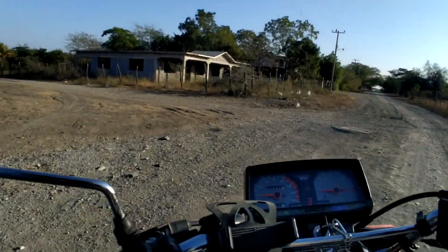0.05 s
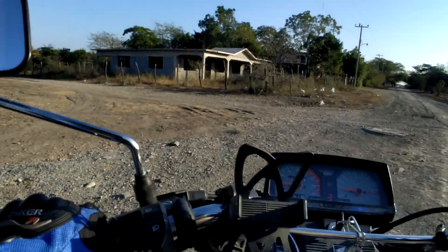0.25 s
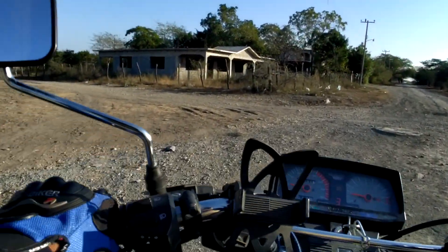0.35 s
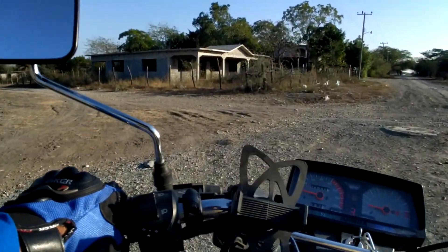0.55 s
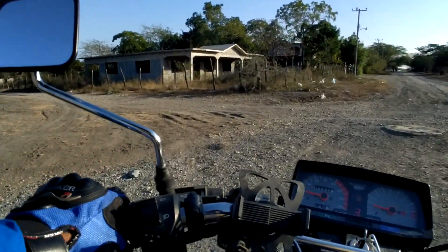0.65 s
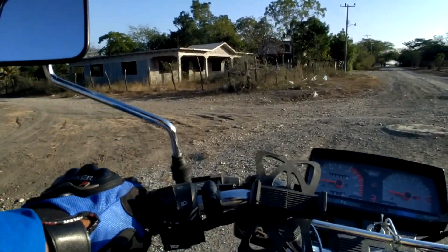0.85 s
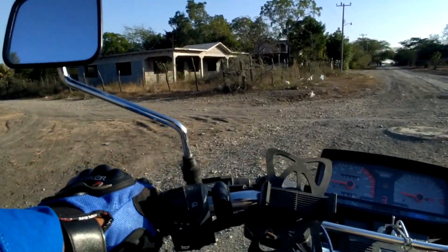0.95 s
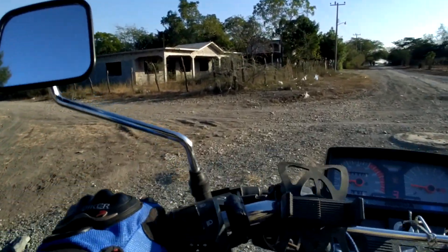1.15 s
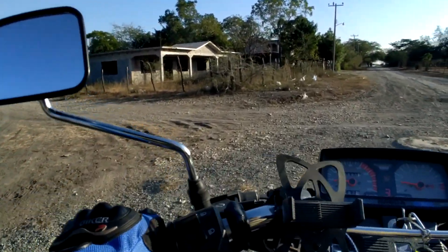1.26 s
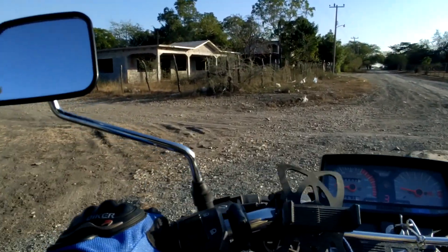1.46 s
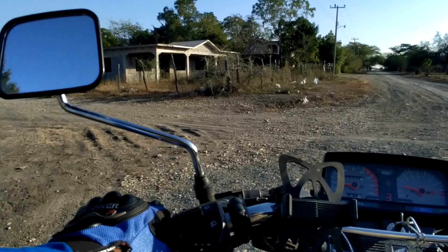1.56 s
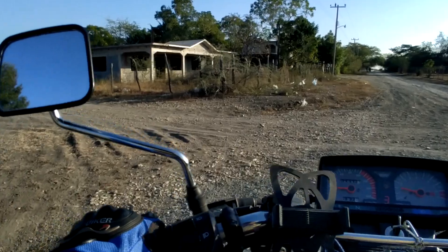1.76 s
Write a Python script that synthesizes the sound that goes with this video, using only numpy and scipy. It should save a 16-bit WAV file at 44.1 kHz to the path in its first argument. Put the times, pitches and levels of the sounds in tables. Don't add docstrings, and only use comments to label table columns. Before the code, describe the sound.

A motorcycle engine idles with sharp metallic ticking, revs up, then eases back, outdoors in light wind.

```python
import sys
import numpy as np
from scipy import signal
from scipy.io import wavfile
from scipy.ndimage import uniform_filter1d

SR = 44100
rng = np.random.default_rng(int(sys.argv[2]) if len(sys.argv) > 2 else 0)


def magnitude_from_level(level_db):
    exponent = np.asarray(level_db, float) / 20
    return 10 ** exponent


def persist_wave(psi):
    counts = np.round(np.clip(psi, -1, 1) * 32767).astype(np.int16)
    wavfile.write(sys.argv[1], SR, np.atleast_2d(counts).T)


N = 79380

# (time [s], cycle rate [cycles/s])
ENGINE_SPEED = [(0.0, 10.64), (0.17, 10.69), (0.3, 10.06), (0.46, 10.73), (0.62, 10.42), (0.8, 11.96),
                (0.97, 14.02), (1.1, 16.9), (1.25, 20.27), (1.38, 21.79), (1.46, 19.98), (1.6, 17.73),
                (1.8, 15.1)]
# (time [s], level [dB])
EFFORT = [(0, -60), (.2, -62.5), (.6, -61.5), (.72, -58.5), (.9, -55), (1.0, -52.5), (1.15, -46),
          (1.36, -42), (1.5, -45.5), (1.62, -48), (1.8, -52.5)]
# (time [s], level [dB])
THROTTLE = [(0, -50), (.07, -42), (.2, -50.5), (.33, -47.5), (.5, -52.5), (.7, -48), (.8, -45), (.86, -49),
            (.885, -62), (1.0, -44.5), (1.15, -41), (1.25, -34), (1.3, -38.5), (1.35, -33.5), (1.45, -45),
            (1.6, -39.5), (1.8, -49.5)]
# (frequency [Hz], width [Hz], idle level [dB], full-speed level [dB], second valve's extra level [dB])
HEAD_MODES = [(2164, 220, -48, -6.5, -8), (3073, 246, -9, -8.5, -31), (3508, 28, -9.5, -29, -13),
              (4010, 430, -20, -2, -1), (5205, 410, -10.5, -1.5, -16), (5628, 120, -6.5, -6.5, -11),
              (6880, 180, -31, -0.5, -21), (8130, 360, -19, -1, -5), (9520, 870, -6.5, -4, -27),
              (11750, 570, -13.5, -3.5, -13), (13200, 710, -14, -13, -6), (15000, 500, -12, -8, -1)]
# (frequency [Hz], width [Hz], level [dB])
OVERRUN_MODES = [(5600, 250, 4.5), (4060, 200, 3), (3120, 200, 3)]
# (frequency [Hz], density [dB per Hz])
EXHAUST_HISS = [(3000, -9), (6000, -10), (7200, 6), (8500, 10), (10000, 5), (12000, 3.5), (15500, -4)]
# (frequency [Hz], width [Hz], level [dB])
AIRBOX_MODES = [(562, 39, -8.5), (790, 97, 2), (971, 34, 1), (1107, 27, -3), (1193, 41, 2), (1341, 19, 0.5),
                (1507, 160, -7)]
# (place [cycles], length [cycles], level [dB])
GULPS = [
    (0.216, 0.073, -1.5),
    (0.368, 0.092, -5.5),
    (0.698, 0.2, -11),
]
# (time [s], peak level [dB], frequency [Hz], t60 [s])
HONKS = [(.045, -46, 980, .1), (0.058, -43, 1200, 0.086), (0.143, -41, 1210, 0.066),
         (0.32, -44.5, 1348, 0.25), (0.427, -42, 1000, 0.097), (0.476, -47.5, 1297, 0.22),
         (.523, -48, 1263, 0.087), (0.531, -37, 800, 0.075), (.617, -44, 990, 0.069),
         (0.706, -45.5, 1327, 0.18), (0.801, -38, 986.6, 0.13), (0.88, -33, 981, 0.13),
         (0.913, -37, 980, .06), (0.953, -34, 997, .11), (0.985, -33, 975, 0.028),
         (1.023, -30, 1086, 0.069), (1.057, -39.5, 1036, 0.24), (1.086, -34, 1051, 0.072),
         (1.096, -40, 1200, 0.2), (1.14, -35, 1328, 0.13), (1.168, -35, 1245, 0.074),
         (1.196, -37, 1090, 0.22), (1.246, -29.5, 1124, 0.098), (1.257, -32, 1340, .15),
         (1.317, -33, 1060, 0.13), (1.343, -29.5, 978, 0.14), (1.348, -31, 1102, 0.21),
         (1.378, -31, 960, 0.05), (1.391, -33, 1077, 0.039), (1.412, -32, 1000, 0.083),
         (1.424, -38, 570, 0.18), (1.463, -34, 988, 0.067), (1.466, -43, 563, 0.11),
         (1.505, -46.5, 562, 0.18), (1.544, -52.5, 1199, 0.14), (1.596, -37, 1204, 0.065),
         (1.742, -35.5, 1127, 0.055), (1.779, -37, 1104, 0.07)]
# (frequency [Hz], density [dB per Hz])
WHIRR_SPECTRUM = [(180, -53), (350, -9), (620, -14.5), (1100, -1), (1870, -4), (3950, -9), (6000, -11),
                  (7080, -7), (16000, -31.5)]
# (frequency [Hz], width [Hz], level [dB])
WHIRR_BANDS = [(2270, 440, -11), (3530, 160, 34), (3930, 110, 31), (7900, 83, 21), (6840, 60, 36),
               (6570, 450, 11)]
# (time [s], peak level [dB], frequency [Hz], t60 [s])
RATTLES = [
    (.0005, -35, 14660, 0.03),
    (.001, -35, 13200, 0.012),
    (0.024, -33, 13620, 0.036),
    (0.208, -35.5, 890, 0.16),
    (0.242, -35.5, 820, 0.091),
    (0.349, -55.5, 7400, 0.11),
    (0.828, -41.5, 8270, 0.022),
    (1.514, -41, 13700, 0.017),
    (1.66, -41, 13500, .08),
]
# (time [s], level [dB])
GUSTS = [(0.0, -56.5), (0.1, -48), (0.134, -27.5), (0.18, -31.5), (0.21, -27), (0.25, -12.5),
         (0.274, -25.5), (0.396, -54), (0.51, -27), (0.66, -42), (0.896, -30.5), (0.946, -47),
         (1.172, -49.5), (1.182, -35.5), (1.382, -46.5), (1.422, -41.5), (1.728, -59.5), (1.8, -59)]
# (frequency [Hz], density [dB per Hz])
TURBULENCE = [(20, -25), (50, -11.5), (100, 2), (200, -1.5), (350, -8), (600, -28), (1000, -30.5),
              (2000, -66)]
# (time [s], peak level [dB], frequency
# [Hz], length [cycles])
EDDIES = [(0.138, -25, 225, 0.72), (0.154, -27, 190, 2.5), (0.207, -13.5, 264, 1.4),
          (0.212, -6.5, 430, 1.34), (.217, -8.5, 198, 0.96), (0.2238, -14, 256, 1.5),
          (0.2282, -17, 247, 1.23), (0.2386, -18.5, 230, 0.64), (0.243, -13, 201, 1.35),
          (0.2477, -16, 385, 0.7), (0.256, -8.5, 196, 0.49), (.248, -21.5, 100.6, 2.2),
          (0.269, -30, 143, 3.1), (0.296, -19.5, 121, 1.15), (.447, -27, 200, 0.94),
          (0.463, -22, 111, 1.63), (.473, -27.5, 420, 1.36), (0.475, -20, 134, 0.8),
          (0.482, -23.5, 150, .8), (0.492, -27, 160, 1.6), (0.507, -15.5, 135, 0.88),
          (0.5133, -14, 297, 1.14), (0.526, -29, 140, 0.95), (.549, -20, 256, 0.65),
          (0.5576, -12, 186, 0.7), (.546, -16.5, 148, 0.9), (.56, -31, 597, 1.9), (.573, -20, 105, 2.3),
          (0.579, -26, 220, 0.36), (0.689, -29, 185, 0.84), (0.754, -26.5, 168, 2.1),
          (1.56, -27.5, 104, 1.6), (.803, -24, 180, 2.3), (.82, -26.5, 242, 1.5), (0.847, -19.5, 146, 0.9),
          (0.887, -16.5, 182, 1.94), (0.902, -21.5, 141, 2.2), (0.919, -23.5, 113, 2.3),
          (1.19, -30, 199, 1.25), (1.419, -30.5, 163, 2.6), (1.462, -27.5, 115, 2.5),
          (1.476, -31.5, 125, 1.3), (1.487, -30, 128, 0.87), (1.497, -31, 201, 1), (1.503, -24.5, 105, 1),
          (1.514, -30, 97.2, 0.91)]
# (frequency [Hz], density [dB per Hz])
RUMBLE_SPECTRUM = [(15, -26), (40, -0.5), (80, 2.5), (160, -17), (400, -19), (800, -52)]

FIRST_TICK_S = 0.0248
IDLE_HZ, FULL_HZ = 10.5, 21.5
SECOND_VALVE_AT = 0.582
TICK_FOLLOW = 0.87
PISTON_HZ = 3450
FULL_PULL = 6


def evened(x):
    return x / np.sqrt(np.mean(x ** 2) + 1e-20)


def curve(table):
    times, values = np.transpose(table)
    return np.interp(np.arange(N) / SR, times, values)


def resonate(x, hz, width):
    r = np.exp(-np.pi * width / SR)
    return 2 * signal.lfilter([1 - r], [1, -r * np.exp(2j * np.pi * hz / SR)], x).real


def noise(spectrum, patchy_db, size=512):
    frames, hz = 4 * N // size + 5, np.fft.rfftfreq(size, 1 / SR)
    real, imaginary, patches = rng.standard_normal((frames, len(hz), 3)).T
    patches = uniform_filter1d(patches, size=5, axis=0)
    patches = evened(uniform_filter1d(patches, size=8, axis=1))
    f, db = np.transpose(spectrum)
    shape = np.interp(np.log(hz + 1), np.log(f + 1), db)[:, None]
    bins = (real + 1j * imaginary) * magnitude_from_level(shape + patchy_db * patches)
    return evened(signal.istft(bins, nperseg=size, noverlap=3 * size // 4)[1][:N])


def crank(place=0.):
    rate = curve(ENGINE_SPEED)
    turns = np.cumsum(rate) / SR
    turns = turns - turns[round(FIRST_TICK_S * SR)] - place + 2
    part = turns % 1
    revs = np.clip((rate - IDLE_HZ) / (FULL_HZ - IDLE_HZ), 0, 1)
    return turns.astype(int), part, part / rate, revs


def onsets(cycle):
    return np.diff(cycle, prepend=cycle[0]) > 0


def vary(cycle, spread_db, count=1):
    return magnitude_from_level(spread_db * rng.standard_normal((40, count))[cycle].T)


def effort_db(follow):
    db = curve(EFFORT)
    return db.max() + follow * (db - db.max())


def pull():
    return uniform_filter1d(np.gradient(curve(ENGINE_SPEED)) * SR, size=6000) / FULL_PULL


def load_db(hz):
    return 7 * np.clip(pull(), -1, 1) * np.exp(-((hz - PISTON_HZ) / 250) ** 2)


def overrun_db(hz):
    drag = np.clip(-pull(), 0, 1)
    return drag * sum(db * np.exp(-((hz - f) / width) ** 2) for f, width, db in OVERRUN_MODES)


def valves():
    tick_db, strike_db, second_valve_db, spread_db = 16, 23, -6, 1.5
    rise_s, decay_s, quicken = 0.00078, 0.0067, 0.49
    dull_hz = 8350
    out = np.zeros(N)
    for second, place in enumerate([0, SECOND_VALVE_AT]):
        cycle, _, since, revs = crank(place)
        strike = magnitude_from_level(strike_db) * onsets(cycle)
        scrape = (1 - np.exp(-since / rise_s)) * np.exp(-since / decay_s / (1 - quicken * revs))
        level = magnitude_from_level(effort_db(TICK_FOLLOW) + tick_db)
        gains = vary(cycle, spread_db, count=len(HEAD_MODES))
        for (hz, width, idle_db, full_db, second_db), gain in zip(HEAD_MODES, gains):
            db = idle_db + (full_db - idle_db) * revs + second * (second_valve_db + second_db)
            db = db + load_db(hz) + overrun_db(hz)
            blow = strike * np.exp(-hz / dull_hz) + scrape * rng.standard_normal(N)
            ring = resonate(resonate(level * gain * magnitude_from_level(db) * blow, hz, 4.3 * width), hz, width)
            out += ring * np.sqrt(SR / width / 10)
    return out


def piston():
    slap_db, full_speed_db, second_db, width = 13, -10, -3, 200
    slaps = np.zeros(N)
    for place, db in [(0, 0), (SECOND_VALVE_AT, second_db)]:
        cycle, _, _, revs = crank(place)
        level = effort_db(TICK_FOLLOW) + slap_db + full_speed_db * revs + db + load_db(PISTON_HZ)
        slaps += onsets(cycle) * magnitude_from_level(level)
    ring = resonate(resonate(slaps, PISTON_HZ, 4 * width), PISTON_HZ, width)
    return ring * SR / (2 * np.pi * width)


def exhaust_thump():
    idle_db, full_db, load_share = -33, -34, 0.66
    cycle, part, since, revs = crank(0.4025)
    pitch = vary(cycle, 0.5)[0]

    def ring(hz, rise_s):
        swell = (since / rise_s * np.exp(1 - since / rise_s)) ** 2
        return swell * np.sin(2 * np.pi * hz * pitch * since)

    thump = ring(115.1, 0.0099) + magnitude_from_level(-9) * ring(203, 0.0035)
    thump *= vary(cycle, -1)[0] * magnitude_from_level(idle_db + (full_db - idle_db) * revs)
    fade = np.minimum(10 * (1 - part), 1)
    return thump * fade * magnitude_from_level(load_share * load_db(PISTON_HZ))


def exhaust_hiss():
    cycle, part, _, _ = crank(0.18)
    length_cycles = 0.89
    puff = np.sin(np.pi * np.minimum(part / length_cycles, 1)) ** 2 * vary(cycle, 2)[0]
    return puff * noise(EXHAUST_HISS, 1.0, size=256) * magnitude_from_level(effort_db(1.32) + 3.5)


def intake():
    gate = magnitude_from_level(-13) * np.ones(N)
    for place, cycles, db in GULPS:
        cycle, part, _, _ = crank(place)
        gulp = np.sin(np.pi * np.sqrt(np.minimum(part / cycles, 1))) ** 2
        gate += magnitude_from_level(db) * vary(cycle, 2.5)[0] * gulp
    mode_gains = vary(crank()[0], 1.5, count=len(AIRBOX_MODES))
    gates = gate * uniform_filter1d(mode_gains, size=600, axis=1)
    box = np.zeros(N)
    for (hz, width, db), mode_gate in zip(AIRBOX_MODES, gates):
        rush = resonate(mode_gate * rng.standard_normal(N), hz, 3 * width)
        box += magnitude_from_level(db) * resonate(rush, hz, width) / np.sqrt(width)
    return evened(box) * magnitude_from_level(curve(THROTTLE) - 5)


def honks():
    rise_s, wobble_share = 0.0032, 0.0419
    wobble = 1 + wobble_share * evened(uniform_filter1d(rng.standard_normal(N), size=150))
    wobbly_time = np.cumsum(wobble) / SR
    out = np.zeros(N)
    for s, db, hz, t60 in HONKS:
        since = np.maximum(np.arange(N) / SR - s, 0)
        envelope = (1 - np.exp(-since / rise_s)) * magnitude_from_level(db + 1.5 - 60 * since / t60)
        out += envelope * np.sin(2 * np.pi * hz * wobbly_time)
    return out


def fins():
    width, taps_per_s, sizes_db = 28, 14, 3.5
    f, db = np.transpose(WHIRR_SPECTRUM)
    out = np.zeros(N)
    for hz in rng.uniform(3200, 15700, size=70):
        sizes = magnitude_from_level(sizes_db * np.minimum(rng.exponential(1, N), 3))
        taps = (rng.random(N) < taps_per_s / SR) * sizes
        ping = resonate(resonate(taps, hz, 6 * width), hz, width)
        out += magnitude_from_level(np.interp(np.log(hz), np.log(f), db)) * ping
    return evened(out)


def whirr():
    bands = np.zeros(N)
    for hz, width, db in WHIRR_BANDS:
        band = evened(resonate(rng.standard_normal(N), hz, width))
        bands += magnitude_from_level(db + 3.4 * load_db(hz)) * band
    haze = noise(WHIRR_SPECTRUM, 2.5) + magnitude_from_level(-9.5) * evened(bands) + fins()
    pulse_db = 4 * np.exp(-crank()[1] / 0.35)
    return haze * magnitude_from_level(effort_db(1) - 1 + pulse_db)


def rattles():
    t, out = np.arange(N) / SR, np.zeros(N)
    for s, db, hz, t60 in RATTLES:
        width = min(800, hz / 2)
        ring = evened(resonate(resonate(rng.standard_normal(N), hz, width), hz, width))
        out += ring * (t > s) * magnitude_from_level(db - 1 - 60 * np.abs(t - s) / t60)
    return out


def wind():
    gust = curve(GUSTS)
    level = gust.max() + 0.91 * (gust - gust.max()) - 6.5
    turbulence = noise(TURBULENCE, 3, size=1024) * magnitude_from_level(level)
    return turbulence + magnitude_from_level(-47) * noise(RUMBLE_SPECTRUM, 3.3, size=2048)


def eddies():
    edge = 0.13
    t, out = np.arange(N) / SR, np.zeros(N)
    for s, db, hz, cycles in EDDIES:
        u = (t - s) * hz
        swing = np.cos(2 * np.pi * u) + edge * np.cos(4.6 * np.pi * u) * np.exp(-8 * u ** 2)
        out -= magnitude_from_level(db) * np.exp(-(2 * u / cycles) ** 2) * swing
    return out


def scene():
    engine = valves() + piston() + exhaust_thump() + exhaust_hiss() + intake() + honks()
    return (engine + whirr() + rattles() + wind() + eddies())[None]


def low_pass(x):
    return signal.sosfilt(signal.butter(12, 17080, fs=SR, output="sos"), x)


def record(dry):
    limit, low_hz, top_hz = 0.42, 45, 15900
    soft = limit * np.tanh(dry / limit)
    low_cut = signal.butter(2, low_hz, "highpass", fs=SR, output="sos")
    top_cut = signal.firwin(511, top_hz, window=("kaiser", 9), fs=SR)[None]
    mix = signal.oaconvolve(signal.sosfilt(low_cut, soft), top_cut, "same")
    return low_pass(mix)


dry = scene()
out = record(dry)
persist_wave(out)
```